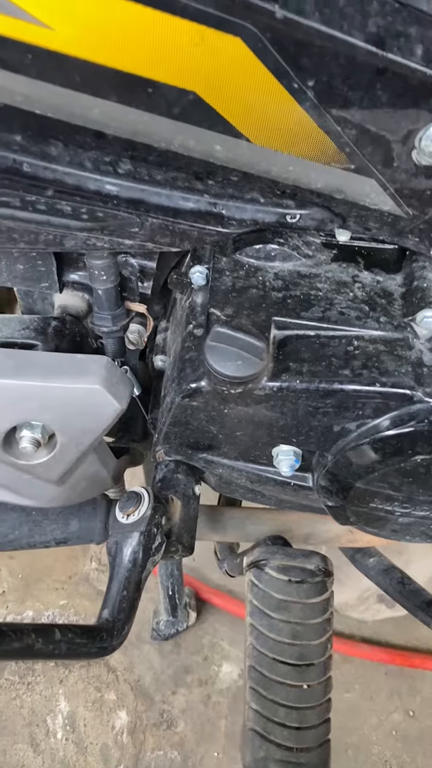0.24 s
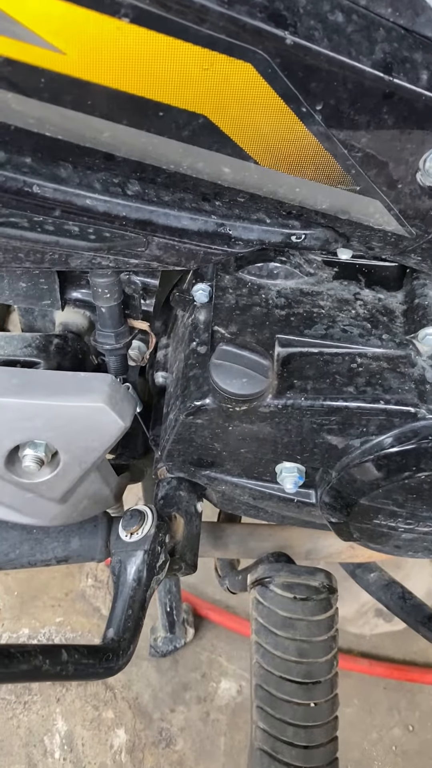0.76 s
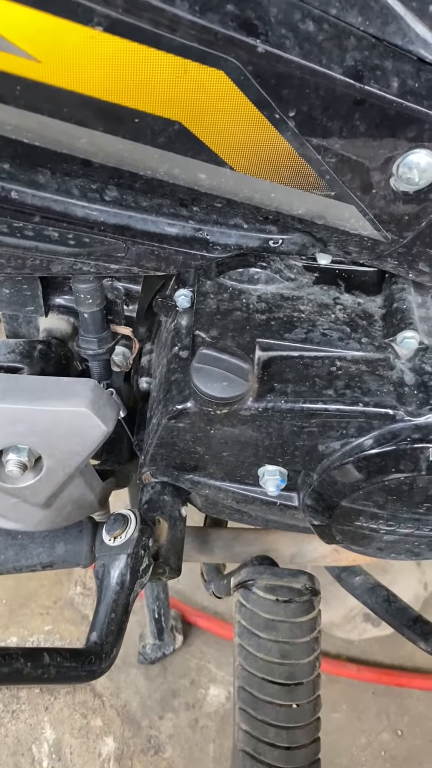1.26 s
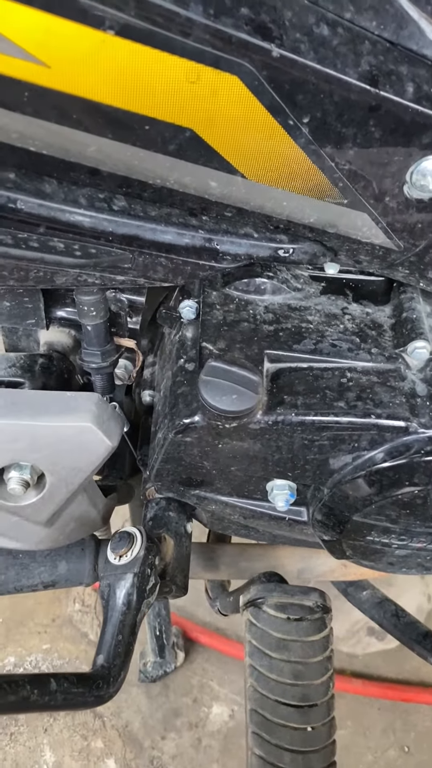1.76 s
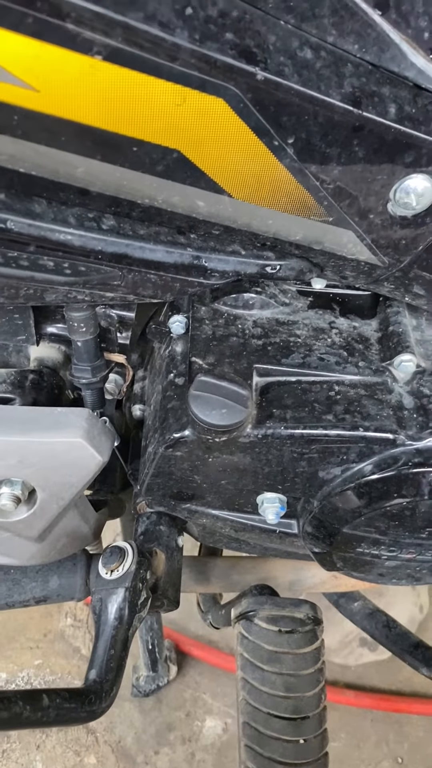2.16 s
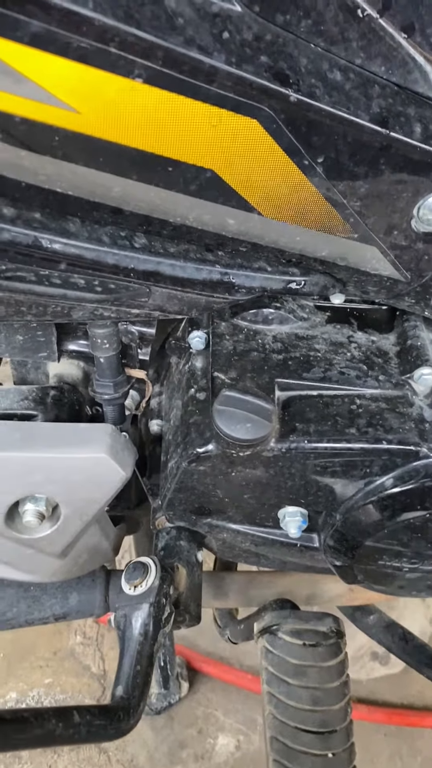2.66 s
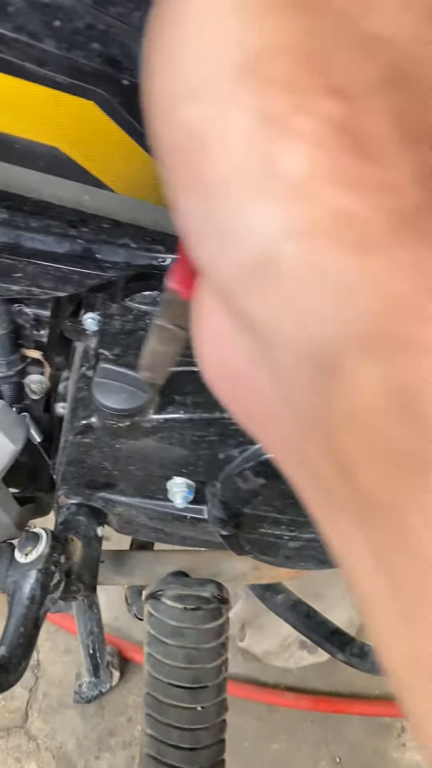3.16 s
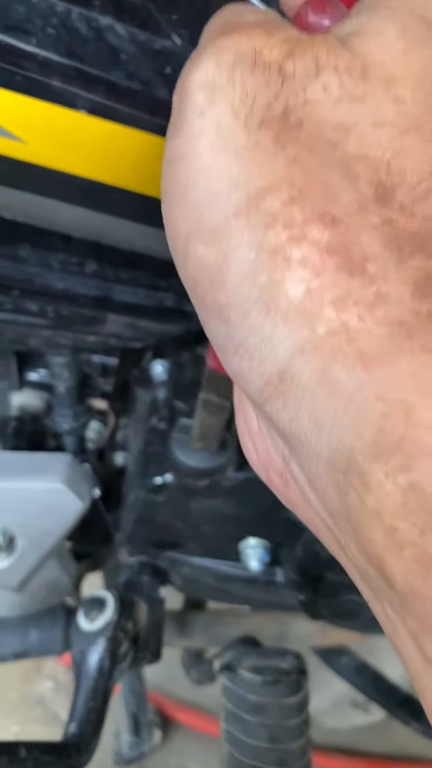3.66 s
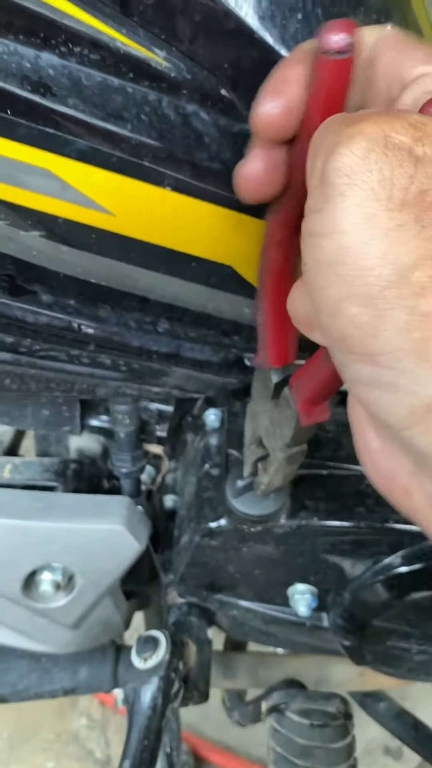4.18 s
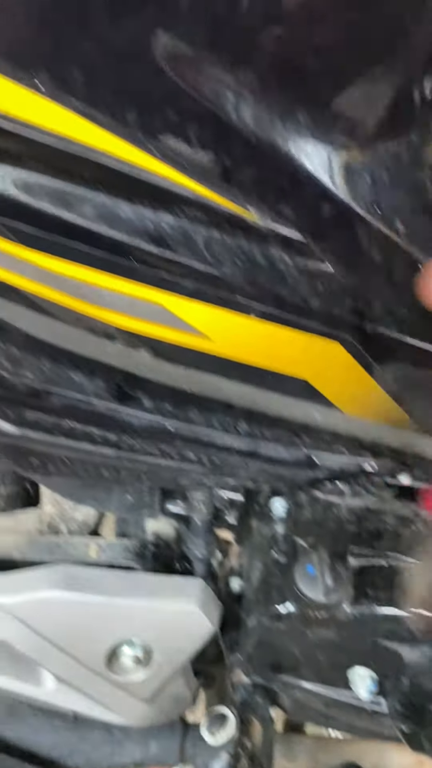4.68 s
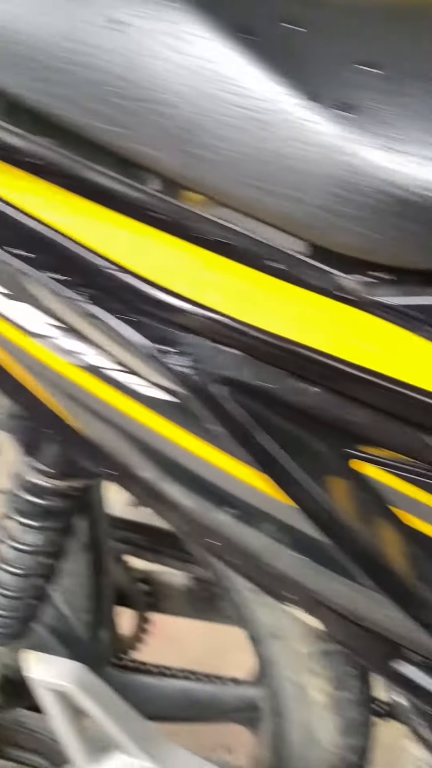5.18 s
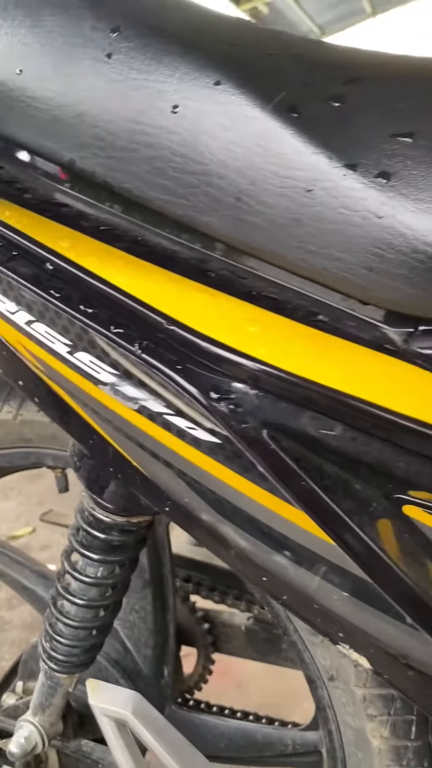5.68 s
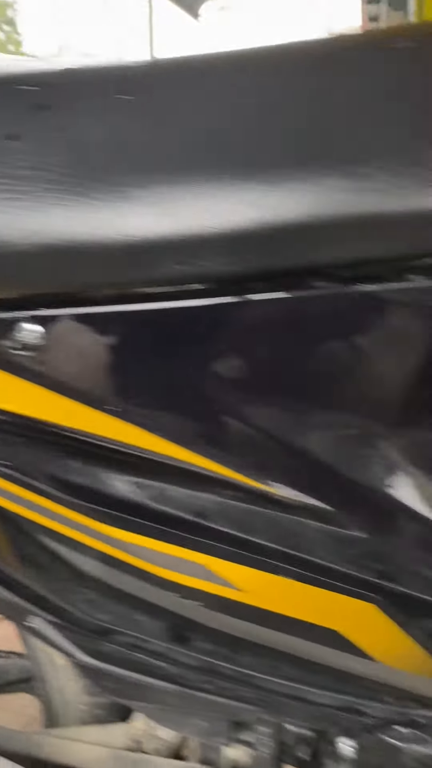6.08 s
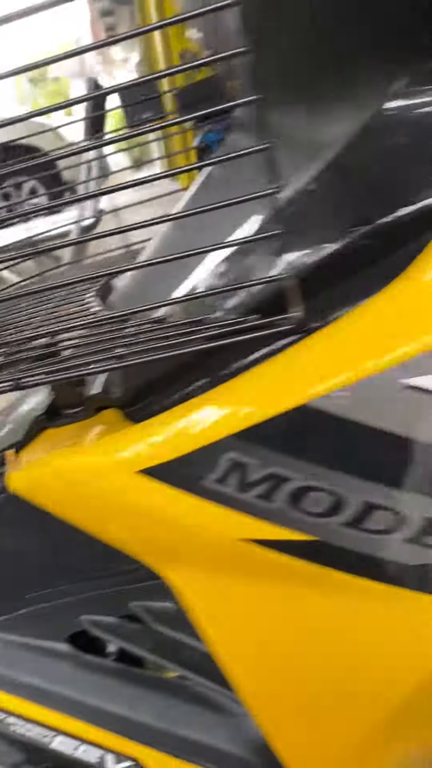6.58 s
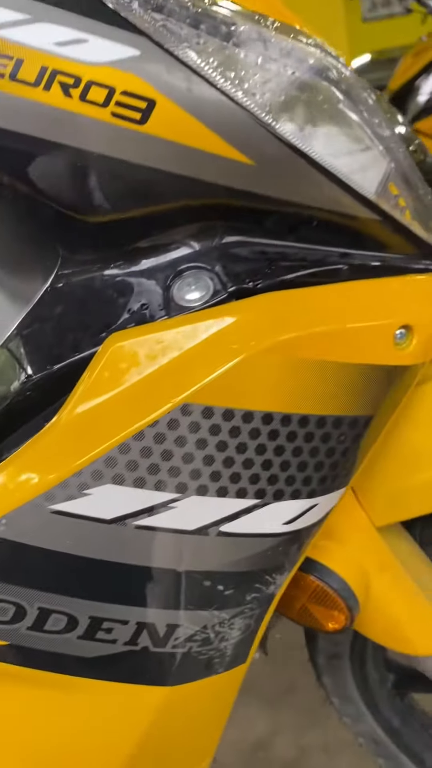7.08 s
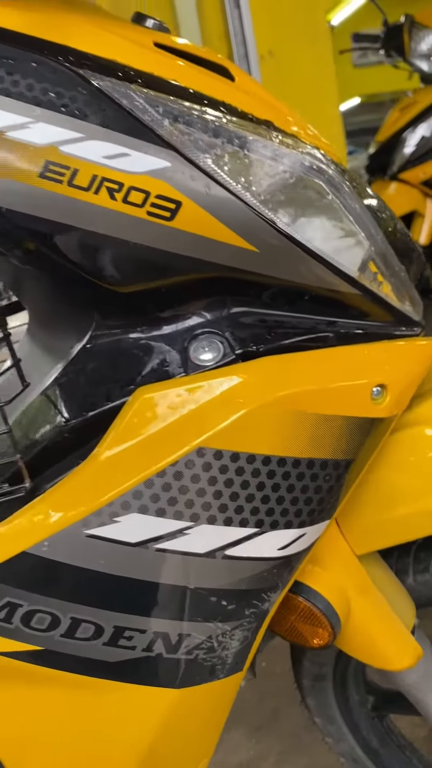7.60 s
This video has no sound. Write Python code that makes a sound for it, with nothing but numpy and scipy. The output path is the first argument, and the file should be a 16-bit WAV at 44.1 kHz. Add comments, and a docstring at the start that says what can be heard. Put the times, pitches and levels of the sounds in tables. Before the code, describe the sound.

Outdoor-feeling workshop beside a road, heard by a stereo phone microphone. Distant traffic drones, roars and hisses all through, with low hums wavering underneath; tyre hiss is strongest around 0.5 s, and a low tone sinks in the first 0.9 s. A small engine slows until about 1.5 s. Close steel clicks fall at 0.0 and 0.26 s, then a brighter cluster at 0.95-1.1 s. At 1.5 s a tool drops: a very sharp crack with tiny bounces, and a brief soft whistling air puff. From 1.5 s a near single-cylinder engine throbs low and steady, slowly quickening and fading after 5 s. A faint click comes at 2.1 s, light plier clicks at 3.4, 3.5 and 3.7 s, a dry knock at 4.07 s. A rough air burst at 4.85 s precedes a hiss with falling whistle at 5.1 s, then a dry tick. Another engine speeds up from 6 s, growling louder to the end.

```python
"""Roadside workshop

An open workshop beside a road, heard by a phone with two microphone ports. Far off, traffic noise drones,
roars and hisses; nearer, one small engine gains speed, a second one slows and later speeds up, built as tones
at multiples of the firing rate. Close by, steel tools click and one drops, as noise cracks over ringing modes,
and an air line puffs noise and a sinking whistle. The phone turns its gain down after the loudest blow."""
import sys
import numpy as np
from scipy import signal
from scipy.fft import rfft, irfft, next_fast_len
from scipy.io import wavfile
from scipy.ndimage import uniform_filter1d, minimum_filter1d, map_coordinates

SR = 44100
rng = np.random.default_rng(int(sys.argv[2]) if len(sys.argv) > 2 else 0)


def file_out(sig):
    """Save sig as 16-bit WAV at sys.argv[1]."""
    # one column per channel
    cols = np.atleast_2d(sig).T
    # limit, then scale
    lim = np.clip(cols, -1, 1)
    pcm = np.round(lim * 32767).astype(np.int16)
    wavfile.write(sys.argv[1], SR, pcm)


N = 345680
TIME = np.arange(N) / SR

# Distant traffic: (time [s], motors' drone level [dB], tyres' hiss level [dB])
TRAFFIC = [(0.0, -44.5, -44), (0.52, -43, -41), (0.9, -43, -46), (1.3, -47, -49), (1.65, -47, -47),
           (1.95, -46, -49.5), (2.9, -45, -50), (3.84, -43, -50.5), (4.72, -43.5, -54), (5.31, -49.5, -53),
           (6.0, -50, -54), (6.7, -47, -52), (7.25, -40.5, -51.5), (7.84, -41, -50)]
# Two bands of motor noise, the second lower and narrower: (time [s], level [dB])
WHIRR_LEVEL = [(0, -72), (.5, -50.5), (1.1, -60), (1.7, -55.5), (2.3, -53), (3.0, -58), (3.84, -49.5),
               (4.5, -49.5), (5.05, -50.5), (5.3, -57.5), (6.6, -67.5), (7.2, -57), (7.84, -62)]
WHINE_LEVEL = [(0, -52.5), (1.6, -61.5), (2.1, -50.5), (2.8, -57), (4.0, -60), (5.2, -65.5), (5.8, -54),
               (6.5, -60), (7.0, -66), (7.84, -69)]
# Traffic noise colours, common to both ports or opposed between them (SIDE): (frequency [Hz], density [dB per Hz])
RUMBLE = [(15, -55), (32, -30), (50, -13), (75, -9), (100, -5), (150, -3.5), (180, -2), (215, -11.5),
          (260, -8.5), (330, -14), (450, -37), (700, -98.5)]
DRONE = [(150, -24), (250, -0.5), (275, -8), (372, -3), (477, -7), (700, -16), (910, -45.5), (1540, -120)]
DRONE_SIDE = [(35, -43), (60, -28.5), (91, -12.5), (135, -4), (204, -9.5), (258, -6), (386, -6),
              (469, -5.5), (700, -10), (910, -37), (1540, -120)]
WHIRR = [(900, -58), (1120, -2.5), (1260, 7), (1380, -6), (1700, -75)]
WHINE = [(650, -63), (750, -2), (790, 2), (830, -4.5), (950, -68)]
ROAR = [(350, -12.5), (600, -8.5), (794, -5.5), (933, -8.5), (997, -6), (1430, -7.5), (2310, -18),
        (2500, -19), (3250, -41), (5500, -120)]
ROAR_SIDE = [(350, -33.5), (600, -9), (933, -7.5), (1030, -5.5), (1410, -8.5), (2020, -18.5), (2500, -16),
             (3250, -48), (5500, -120)]
HISS = [(1180, -2.5), (2000, 1.5), (2310, 0.5), (3610, 0), (8080, -13.5), (8510, -34), (9030, -71),
        (10500, -53.5), (10900, -46.5), (11900, -26.5), (15500, -43)]
HISS_SIDE = [(1180, -18), (2000, 0), (2920, 4), (4140, -2.5), (6990, -4.5), (7610, -4), (8220, -2.5),
             (12100, -11.5), (15500, -50.5)]
# Place of wide noise: (frequency [Hz], share towards left [0-1], share by left lead [0-1]); minus is right
NOISE_LEAN = [(101.6, .7, -.3), (300, 0.6, -.3), (600, 0.58, -.3), (1100, 0.1, -.5), (2200, 0.02, 0),
              (5000, -0.1, 0.29)]
# Tilt of low sounds between the ports: (frequency [Hz], gain on left and loss on right [dB])
BASS_LEAN = [(30, 2), (70, -0.5), (150, 0.94), (300, 1.3)]
RUMBLE_DB, RUMBLE_FOLLOWS = -38, .4  # level; share of the tyres' swing
ROAR_DB, ROAR_TYRES, ROAR_MOTORS = -47, 0.17, 0.17  # mean level; shares of both swings

# Low hum: (time [s], level [dB])
HUM_LEVEL = [(0, -49), (.5, -42.5), (.85, -38), (1.2, -43.5), (1.5, -49), (2.3, -41), (3.201, -32.5),
             (3.7, -46.5), (4.3, -41.5), (4.8, -35), (5.5, -37.5), (6.3, -43.5), (7.3, -39.5),
             (7.84, -41.5)]
# Pair of low tones that sinks once: (time [s], upper tone [Hz], its level [dB])
GLIDE = [(0, 161.3, -39), (.25, 156.7, -36), (.4, 151.6, -33.5), (.55, 139.8, -33), (.7, 128.6, -38),
         (.85, 121, -57), (.95, 118, -91.5)]
HUM_HZ, DEEP_HZ, DEEP_DB = 64.5, 36.2, -52.5  # mean pitches; the deeper hum is fainter
GLIDE_LOWER, GLIDE_LOWER_DB = .785, -2  # lower tone against the upper: pitch ratio, level

# Engine loudness: (time [s], level [dB])
NEAR = [(1.1, -46), (1.499, -40), (1.75, -32), (2.2, -35.5), (2.7, -34.5), (3.4, -33.5), (3.9, -35.5),
        (4.5, -36), (5.0, -39.5), (5.5, -39), (6.1, -38), (6.5, -42), (6.9, -44.5), (7.5, -44.5)]
SLOWING = [(0.0, -38), (0.2, -33.5), (0.45, -34), (0.7, -33.5), (1.0, -40.5), (1.15, -35.5), (1.3, -41),
           (1.4, -42.5), (1.449, -30.5), (1.5, -31.5)]
RISING = [(5.6, -55), (6.2, -41), (6.6, -42.5), (7.1, -41), (7.45, -41), (7.65, -35), (7.84, -32)]
# Engine speeds: (time [s], firing rate [Hz])
NEAR_HZ = [(1.1, 24.06), (2.01, 24.11), (2.47, 24.38), (2.93, 24.7), (3.84, 25.76), (4.3, 26.44),
           (5.21, 27.66), (5.67, 28.07), (7.5, 29.72)]
SLOWING_HZ = [(0.0, 22.95), (0.5, 21.6), (1.0, 20.85), (1.5, 21.75)]
RISING_HZ = [(5.6, 22.77), (6.16, 23.62), (6.72, 25.17), (7.28, 26.75), (7.84, 28.05)]
# Exhaust orders: (multiple of the firing rate, relative level [dB])
NEAR_ORDERS = [(2, -11), (3, -12), (4, -2), (5, 3), (6, 1), (7, -2), (8, -12), (9, -15), (10, -13),
               (11, -13), (12, -19), (13, -22)]
SLOWING_ORDERS = [(2, -12.5), (3, -17.5), (4, -2), (5, -19.5), (6, 1), (7, -9), (8, 1), (9, -20), (10, -6),
                  (11, -31.5), (12, -12.5), (14, -20), (16, -19.5), (18, -20.5)]
RISING_ORDERS = [(2, -2.5), (3, -6), (4, -3.5), (5, -2), (6, -0.5), (7, 0.5), (8, -3), (9, -3.5),
                 (10, -2.5), (11, 1), (12, 0), (13, -5.5), (14, -8.5), (15, 2), (16, -9)]
# Standing waves of the shop, and the exhaust colour of the rising engine: (frequency [Hz], gain [dB])
BOOM = [(98, 0), (113, 5), (122, 4), (126.5, 11), (130, 4), (134, 3), (139, -1), (146, 4), (150, -1),
        (155, -5), (163, -11), (170, -5), (176, -13), (185, -3), (195, -13), (203, -8), (212, 6), (238, -8),
        (248, 5), (260, -6), (269, 6), (277, -6), (300, 0)]
RISING_TONE = [(45, -1.5), (53, 1), (57, -4), (100, -0.5), (140, 4), (165, 3), (210, -13.5), (275, -4),
               (310, -10.5), (335, -17), (450, -23)]
# Rough noise let out at each firing: (time [s], level [dB])
SLOWING_GROWL = [(0, -56), (.3, -49), (.45, -45.5), (.6, -48.5), (.8, -64), (1.2, -63)]
RISING_GROWL = [(6.2, -58), (6.8, -53.5), (7.1, -52), (7.45, -49), (7.84, -55.5)]
# Pipe colours of that noise: (frequency [Hz], density [dB per Hz])
SLOWING_PIPE = [(250, -46), (350, -5), (450, -6), (800, 2), (1000, 6), (1250, -3.5), (1800, -6.5),
                (2500, -7), (4000, -62.5)]
RISING_PIPE = [(330, -31), (400, -7), (435, -15.5), (478, 7), (530, 0), (600, 11.5), (660, -11),
               (760, -6.5), (1000, -19.5), (1400, -7.5), (2200, -50.5)]

# Air puffs: (start [s], length [s], hiss level [dB], whistle level [dB], whistle from [Hz], to [Hz])
PUFFS = [(1.39, .06, -74, -55, 6130, 5970), (1.578, 0.17, -55, -46, 4580, 3990),
         (5.074, 0.28, -43.5, -44, 5570, 3990)]
# Air noise of the puffs and of the rougher burst: (frequency [Hz], density [dB per Hz])
JET = [(1000, -43), (2000, 5.5), (4000, -3), (6000, 3.5), (8500, -0.5), (12000, -1), (15500, -4),
       (17000, -38)]
BURST_JET = [(700, -54), (1500, -3), (2300, 4), (4000, -1.5), (6000, -3.5), (8500, 0), (12000, -7.5),
             (15500, -9), (17000, -28.5)]
PUFF_RISE_S, SINK_S = 0.053, 0.034
HISS_FADE_DB_S, WHISTLE_FADE_DB_S, RELEASE_DB_S = 84, 40, 117
BURST_FULL_S, BURST_DB, BURST_HOLD_S = 4.855, -41, 0.056  # a rougher puff without whistle
BURST_RISE_DB_S, BURST_FALL_DB_S = 169, 446

# Blows: (time [s], crack level [dB], ring over the crack [dB], share of the free ring time left by the grip)
RATCHET = [(0.009, -26, 1, 0.91), (0.2621, -30, -22, 1), (0.9568, -19.5, 6, 0.52), (0.9608, -21.5, -3, 1.4),
           (1.0218, -13.5, -2, 1.2), (1.1026, -21.5, -3, 1.4), (1.1062, -30.5, 2, 1.4),
           (2.0867, -36.5, 2, 1.1)]
DROPPED = [(1.5143, -32, -3.5, .9), (1.5178, -24.5, -9, .9), (1.5214, -5.5, -14.5, 1.1),
           (1.546, -19, -16, .8), (1.5615, -14, -23, .9), (1.573, -20, -27, .9)]
KNOCKS = [(.009, -20.5, -3, 1), (.036, -34.5, -14.5, .9), (4.069, -23, -1.5, .95), (4.0784, -41, -1, .95)]
PLIERS = [(3.3844, -35, -21, 0.63), (3.5264, -20.5, 4, 1.25), (3.6696, -23.5, 3, 0.72)]
# Ringing modes: (frequency [Hz], level [dB], t60 [s])
RATCHET_MODES = [(4800, 2, .012), (5150, 3, .012), (5570, -7, .075), (6490, -2, .014), (7710, -2, .014)]
DROPPED_MODES = [(1197, -16, 0.09), (1296, -10.5, 0.059), (2130, 6.5, 0.015), (3360, -8.5, 0.023),
                 (4606, 5, 0.027), (5020, -6, 0.018), (6020, -2, 0.025), (7550, -2.5, 0.015),
                 (8360, 1.5, 0.055), (10260, -10.5, .03)]
KNOCK_MODES = [(1720, -7, 0.025), (2930, 1, 0.014)]
PLIERS_MODES = [(3343, 0, .03), (4300, -13, .012), (5841, -8, .02), (6600, -6, .013), (8366, -14, .024)]
# Crack colours: (frequency [Hz], density [dB per Hz])
RATCHET_CRACK = [(1200, -24), (2000, -7), (2800, -6.5), (4500, 0.5), (6500, 2), (9000, 2), (12000, -6.5),
                 (16000, -7.5)]
DROPPED_CRACK = [(700, -43.5), (1300, -20.5), (2100, -14.5), (3000, -11), (4500, -7), (7000, 2.5),
                 (10000, 2.5), (13000, -2.5), (16000, -16.5)]
KNOCK_CRACK = [(900, -51), (2000, -5.5), (3200, 1.5), (5000, -10.5), (9000, -0.5), (12000, -7.5),
               (16000, -11.5)]
PLIERS_CRACK = [(1000, -40.5), (2800, 0), (4500, -5), (7000, -3.5), (10000, -12.5), (13000, -13),
                (16000, -12.5)]
TICK_S, TICK_DB = 5.3475, -30

# The walls' answer: (frequency [Hz], t60 [s])
SHOP = [(500, 0.75), (4000, 0.057), (12000, 0.0027)]
# Near sounds at the microphone ports: (frequency [Hz], left lead [rad], gain [dB])
PORTS = [(100, 0, 0), (2500, .6, 0), (4500, 1.1, 0), (6300, 1.7, 0), (8300, 3, 0), (11000, 3.4, -2),
         (13500, 4.4, -12), (16000, 5.5, -12)]
TOP_HZ = 16600  # nothing is kept above this


def amp(db):
    """Level in dB to amplitude."""
    return 10 ** (np.asarray(db) / 20)


def unit(x):
    """x scaled to an RMS of one."""
    return x / np.sqrt(np.mean(x ** 2) + 1e-20)


def along(points, hz):
    """Columns of (frequency [Hz], value, ..) points, read on a log axis."""
    f, *cols = np.transpose(points)
    return np.squeeze([np.interp(np.log(hz + 1), np.log(f + 1), c) for c in cols])


def curves(rows):
    """One value per sample for each column after the time."""
    s, *cols = np.transpose(rows)
    return [np.interp(TIME, s, c) for c in cols]


def wobble(rate):
    """A smooth random curve, rate knots a second."""
    coarse = TIME[::32]
    knots = rng.standard_normal(int(N * rate / SR) + 4)
    return np.interp(TIME, coarse, map_coordinates(knots, [coarse * rate]))


def filtered(x, response):
    """x times a (complex) response of frequency."""
    m = next_fast_len(N + SR // 2)
    return irfft(rfft(x, m) * response(np.fft.rfftfreq(m, 1 / SR)), m)[..., :N]


def coloured(colour):
    """White noise shaped to a colour, at unit RMS."""
    return unit(filtered(rng.standard_normal(N), lambda hz: amp(along(colour, hz))))


def leaning(pair):
    """Low sounds are tilted between left and right, by an amount that depends on frequency."""
    return filtered(pair, lambda hz: amp(np.outer([1, -1], along(BASS_LEAN, hz))))


def patchy(depth_db):
    """Two white noises sharing patches of random gain, some 300 Hz by 80 ms."""
    z = signal.stft(rng.standard_normal((2, N)), nperseg=512)[2]
    field = uniform_filter1d(rng.standard_normal(z.shape[1:]), size=4, axis=0)
    field = uniform_filter1d(field, size=14, axis=1)
    return signal.istft(z * amp(depth_db * unit(field)), nperseg=512)[1][:, :N]


def rush(common, opposed, opposed_db, patchy_db):
    """Stereo noise; part of the opposed signal is tied to the common one, which places the source."""
    a, b = patchy(patchy_db)
    tied = lambda hz: np.dot([1, 1j], along(NOISE_LEAN, hz))
    free = lambda hz: np.sqrt(np.clip(1 - abs(tied(hz)) ** 2, 0, 1))
    mid = unit(filtered(a, lambda hz: amp(along(common, hz))))
    side = filtered(a, lambda hz: amp(along(opposed, hz)) * tied(hz))
    side += filtered(b, lambda hz: amp(along(opposed, hz)) * free(hz))
    side = amp(opposed_db) * unit(side)
    return np.array([mid + side, mid - side])


def traffic():
    """Distant motors rumble, drone and whirr as banded noise; tyres roar and hiss in wider bands."""
    (drone_db, hiss_db), (whirr_db,), (whine_db,) = curves(TRAFFIC), curves(WHIRR_LEVEL), curves(WHINE_LEVEL)
    tyres_db = hiss_db - hiss_db.mean()
    motors_db = drone_db - drone_db.mean()

    rumble_db = RUMBLE_DB + RUMBLE_FOLLOWS * tyres_db
    motors = amp(rumble_db + 3.2 * wobble(3.6)) * leaning(coloured(RUMBLE))
    motors += amp(drone_db + 1.3 * wobble(5)) * rush(DRONE, DRONE_SIDE, opposed_db=-5.5, patchy_db=1.37)
    motors += amp(whirr_db + 1.5 * wobble(24)) * rush(WHIRR, WHIRR, opposed_db=-4.0, patchy_db=2.5)
    motors += amp(whine_db + 1.3 * wobble(9.7)) * rush(WHINE, WHINE, opposed_db=-3.5, patchy_db=1.5)

    roar_db = ROAR_DB + ROAR_TYRES * tyres_db + ROAR_MOTORS * motors_db
    tyres = amp(roar_db + 0.43 * wobble(12)) * rush(ROAR, ROAR_SIDE, opposed_db=-3.5, patchy_db=1.5)
    tyres += amp(hiss_db + 0.46 * wobble(11)) * rush(HISS, HISS_SIDE, opposed_db=-1.0, patchy_db=1.27)
    return motors + tyres


def hums():
    """Low tones: two hums of unsteady pitch and level, and a pair that swells and fades while it sinks."""
    (hum_db,), (glide_hz, glide_db) = curves(HUM_LEVEL), curves(GLIDE)
    tones = [(HUM_HZ + 1.53 * wobble(3), amp(hum_db + 2.5 * wobble(6.6))),
             (DEEP_HZ + 1.3 * wobble(1.6), amp(DEEP_DB + 3 * wobble(3.1))),
             (glide_hz, amp(glide_db)),
             (GLIDE_LOWER * glide_hz, amp(glide_db + GLIDE_LOWER_DB))]
    return sum(np.sqrt(2) * gain * np.cos(2 * np.pi * np.cumsum(hz) / SR + 0.5 * wobble(6.1))
               for hz, gain in tones)


def growl(speed, rows, pipe, beat_db, flutter_db):
    """Noise in the pipe's resonances, puffed once a firing and fluttering; silent outside its rows."""
    (level_db,), (hz,) = curves(rows), curves(speed)
    firing = np.cos(2 * np.pi * np.cumsum(hz) / SR)
    beat = unit(amp(beat_db * firing + flutter_db * wobble(15)))
    heard = (TIME >= rows[0][0]) & (TIME <= rows[-1][0])
    return heard * amp(level_db) * beat * rush(pipe, pipe, opposed_db=-3.5, patchy_db=3.5)


def engine(speed, rows, orders, shake_db, colour, boom, spread):
    """Steady firings: one unsteady tone per order, lifted or sunk by a share (boom) of a colour.
    The spread (rad) smears each pulse: orders far from the fourth come out of step."""
    (level_db,), (hz,) = curves(rows), curves(speed)
    turn = 2 * np.pi * np.cumsum(hz) / SR
    fade_in = np.clip((TIME - rows[0][0] + .1) * 10, 0, 1)
    fade_out = np.clip((rows[-1][0] + .1 - TIME) * 10, 0, 1)
    tones = 0
    for k, db in orders:
        order_db = level_db + db + boom * along(colour, k * hz) + shake_db * wobble(5)
        step = spread * (k - 4) ** 2
        tones = tones + np.sqrt(2) * amp(order_db) * np.cos(k * turn - step + .3 * wobble(5))
    return fade_in * fade_out * tones


def engines():
    """Tonal bass of engines and hums, one sample later on the left, with the rough exhaust noise over it."""
    bass = hums()
    bass += engine(NEAR_HZ, NEAR, NEAR_ORDERS, shake_db=1.77, colour=BOOM, boom=0.97, spread=0)
    bass += engine(SLOWING_HZ, SLOWING, SLOWING_ORDERS, shake_db=4.0, colour=BOOM, boom=0.37, spread=.06)
    bass += engine(RISING_HZ, RISING, RISING_ORDERS, shake_db=4.0, colour=RISING_TONE, boom=1, spread=0.124)
    left = np.pad(bass, (1, 0))[:N]
    rough = growl(SLOWING_HZ, SLOWING_GROWL, SLOWING_PIPE, beat_db=3, flutter_db=2.5)
    rough += growl(RISING_HZ, RISING_GROWL, RISING_PIPE, beat_db=6, flutter_db=2.2)
    return leaning(np.array([left, bass])) + rough


def air_line():
    """A jet of air hisses; a fuzzy whistle with a noisy upper skirt sinks as the pressure falls."""
    jet, burst = coloured(JET), coloured(BURST_JET)
    t = TIME - BURST_FULL_S
    burst_db = BURST_DB + BURST_RISE_DB_S * np.minimum(t, 0)
    burst_db -= BURST_FALL_DB_S * np.maximum(t - BURST_HOLD_S, 0)
    out = amp(burst_db + 0.89 * wobble(60)) * burst
    for s, length, hiss_db, whistle_db, from_hz, to_hz in PUFFS:
        t = np.maximum(TIME - s, 0)
        valve = np.minimum(t / PUFF_RISE_S, 1) * amp(-RELEASE_DB_S * np.maximum(t - length, 0))
        hiss = amp(hiss_db - HISS_FADE_DB_S * t) * jet

        hz = to_hz + (from_hz - to_hz) * np.exp(-t / SINK_S)
        fuzz = filtered(rng.standard_normal(N), lambda f: (f < 1300) / (1 + f / 80) ** 0.51)
        skirt = signal.hilbert(unit(fuzz))  # one-sided, so it lies above the whistle only
        whistle = np.real((skirt + 0.68) * np.exp(2j * np.pi * np.cumsum(hz) / SR))
        whistle_gain = amp(whistle_db - WHISTLE_FADE_DB_S * t + 1.2 * wobble(40))
        out += valve * (hiss + whistle_gain * whistle)
    return out


def tool(blows, modes, colour, crack_t60, rise):
    """Each blow is a short crack of noise over the steel's ring, its modes at new strengths every time."""
    out, t = np.zeros(N + SR), TIME[:SR // 4]
    gain = amp(along(colour, np.fft.rfftfreq(len(t), 1 / SR)))
    for s, db, ring_db, free in blows:
        ring = sum(amp(level + rng.normal(0, 1.5) - 60 * t / (free * t60)) * np.sin(2 * np.pi * f * t)
                   for f, level, t60 in modes)
        noise = unit(irfft(rfft(rng.standard_normal(len(t))) * gain, len(t)))
        crack = noise * amp(-60 * t / crack_t60)
        onset = 1 - np.exp(-t / rise)
        out[round(s * SR):][:len(t)] += amp(db) * (amp(ring_db) * ring + crack) * onset
    return out[:N]


def tick():
    """One dry tick: a single-sample pulse."""
    return amp(TICK_DB) * (np.arange(N) == round(TICK_S * SR))


def shop(x):
    """The walls' answer starts 200 samples late; each frequency of its noise tail dies at its own speed."""
    hz, t, z = signal.stft(rng.standard_normal((2, SR // 3)), SR, nperseg=256)
    tail = signal.istft(z * amp(-60 * t / along(SHOP, hz)[:, None]), SR, nperseg=256)[1]
    late = np.pad(x, ((0, 0), (200, 0)))
    return signal.fftconvolve(late, tail / np.linalg.norm(tail[0]), axes=1)[:, :N]


def at_ports(x):
    """A near sound reaches the two ports with a phase gap that grows with frequency; the top is dulled."""
    def response(hz):
        lead, gain_db = along(PORTS, hz)
        return np.exp(np.outer([.5j, -.5j], lead)) * amp(gain_db)
    return filtered(x, response)


def near_sounds():
    """Steel tools and the air line close to the microphone; the walls answer the tools."""
    tools = tool(RATCHET, RATCHET_MODES, RATCHET_CRACK, crack_t60=0.024, rise=0.0012)
    tools += tool(DROPPED, DROPPED_MODES, DROPPED_CRACK, crack_t60=0.032, rise=.0006)
    tools += tool(KNOCKS, KNOCK_MODES, KNOCK_CRACK, crack_t60=.015, rise=0.00025)
    pliers = tool(PLIERS, PLIERS_MODES, PLIERS_CRACK, crack_t60=.012, rise=.0005)
    pliers = pliers * amp([[-2], [2]])  # louder on the right
    # the pliers are closest: almost no answer from the walls
    answer = amp(-12) * shop(tools + amp(-10) * pliers)
    return at_ports(tools + pliers + answer + air_line())


def scene():
    """The road far off, engines nearer, tools and air line beside the microphone."""
    return traffic() + engines() + near_sounds() + tick()


def record(dry):
    """Gain control: a loud peak pulls the gain down over some 70 ms, mostly in the middle band; it recovers."""
    excess_db = np.clip(20 * np.log10(abs(dry).max(axis=0) / .5 + 1e-9), 0, 3)
    held_db = -minimum_filter1d(-excess_db, size=441)  # peaks widened to 10 ms
    u = TIME[:SR] / 0.035
    slow = u ** 2 * np.exp(-u) / (SR / 100)
    cut_db = 3.4 * signal.fftconvolve(held_db, slow)[:N]
    middle = filtered(dry, lambda hz: 1 / (1 + (hz / 3600) ** 6) - 1 / (1 + (hz / 280) ** 6))
    wet = middle * amp(-1.3 * cut_db) + (dry - middle) * amp(-.5 * cut_db)
    # the loudest peaks saturate
    top = .85
    rounded = wet / (1 + abs(wet / top) ** 4) ** .25
    return filtered(rounded, lambda hz: hz < TOP_HZ)


dry = scene()
out = record(dry)
file_out(out)
```